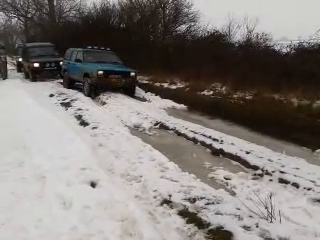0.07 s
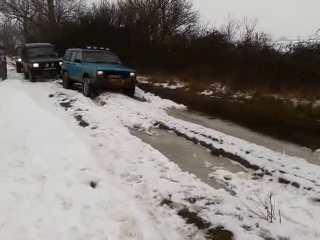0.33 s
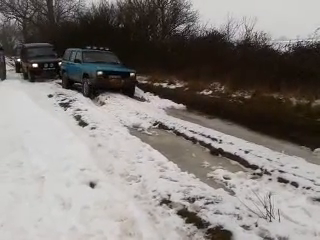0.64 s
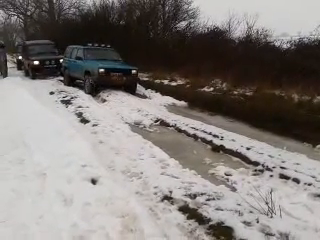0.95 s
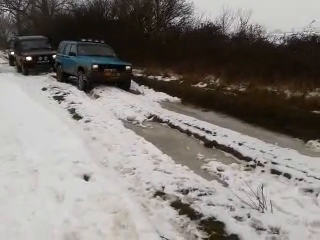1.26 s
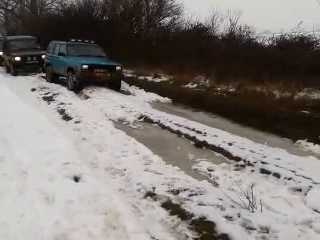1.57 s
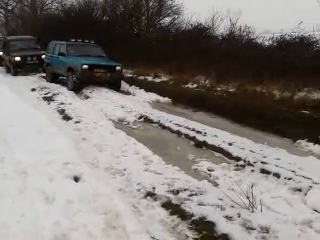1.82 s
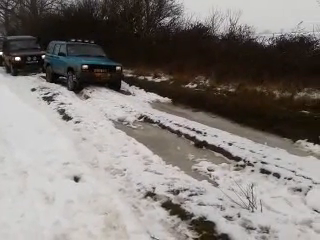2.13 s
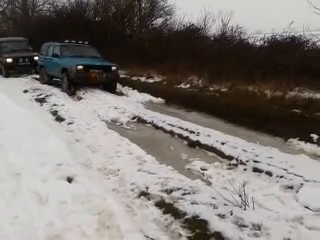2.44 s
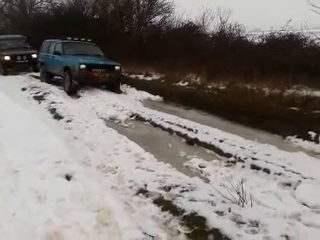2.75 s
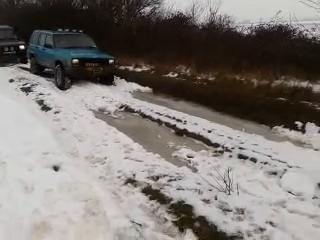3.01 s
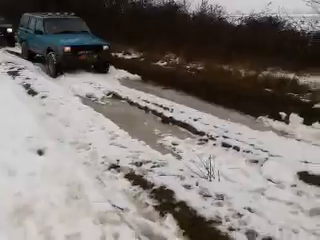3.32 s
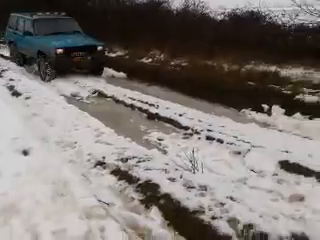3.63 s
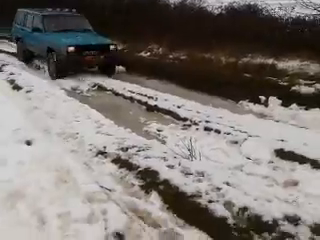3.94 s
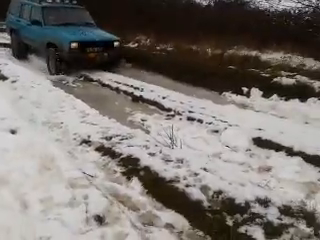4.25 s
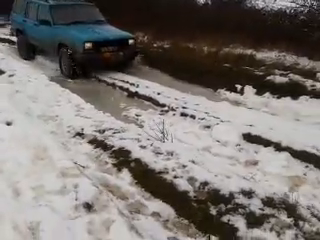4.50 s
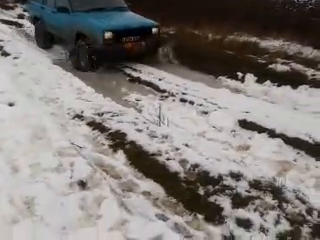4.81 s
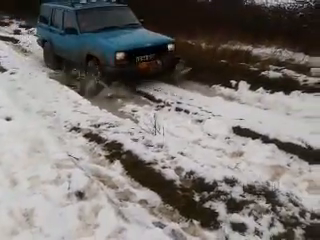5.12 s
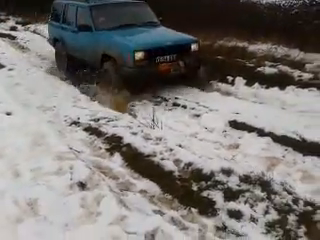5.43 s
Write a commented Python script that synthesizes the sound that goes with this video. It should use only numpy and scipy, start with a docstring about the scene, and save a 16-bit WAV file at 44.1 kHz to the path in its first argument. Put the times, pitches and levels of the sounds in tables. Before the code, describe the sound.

A four-wheel-drive idles beside a knocking diesel, then revs and drives closer, its tyres crunching snow and cracking through ice and slush.

```python
"""Four-wheel-drive on a snowy track

Open snow, light wind rumbling on a narrow-band microphone. A six-cylinder four-wheel-drive idles
about 16 m off, then revs and drives up to 6 m, louder with revs, throttle and nearness. Its firings
boom in the exhaust, its fan hums, and its tyres crunch snow, then crack ice, thud and plop through
a slushy puddle. Behind it a waiting diesel knocks at a steady idle; a few loose rattles ring."""
import sys
import numpy as np
from scipy import signal
from scipy.fft import rfft, irfft, next_fast_len
from scipy.io import wavfile
from scipy.ndimage import map_coordinates

SR = 44100
rng = np.random.default_rng(int(sys.argv[2]) if len(sys.argv) > 2 else 0)


def to_wav(s):
    """Save 16-bit WAV."""
    ch = np.atleast_2d(s).T  # columns
    pcm = np.round(np.clip(ch, -1, 1) * 32767)  # PCM
    wavfile.write(sys.argv[1], SR, pcm.astype(np.int16))


N = 250047
TIME = np.arange(N) / SR

# the six-cylinder's firing rate, from idle to pulling away: t/s, f/Hz
FIRING_RATE = [(0.03, 37.08), (0.4, 35.1), (0.8, 34.12), (1.22, 35.9), (1.6, 34.79), (1.95, 34.66),
               (2.26, 48.1), (2.45, 47.9), (2.75, 42.57), (3, 44.1), (3.3, 57.67), (3.55, 63.06),
               (3.88, 78.07), (4.27, 87.86), (4.5, 99.9), (4.78, 114.3), (5.02, 120.5), (5.35, 112.1),
               (5.64, 102.8)]
IDLE_HZ = 35


def amp(db):
    """Decibels to gain."""
    return 10 ** (np.asarray(db) / 20)


def unit(x):
    """Scale to rms 1."""
    return x / np.sqrt(np.mean(x ** 2) + 1e-20)


def curve(points):
    """One value per sample along the (t/s, value) points."""
    return np.interp(TIME, *np.transpose(points))


def wobble(rate):
    """A smooth random curve, rate knots a second."""
    return map_coordinates(rng.standard_normal(N // 50), [TIME * rate], mode="wrap")


def swell(at_s, width_s):
    """A smooth rise and fall that reaches 1 at at_s."""
    return np.exp(-((TIME - at_s) / width_s) ** 2)


def resonance(points, hz):
    """Gain at this pitch of a body with the (f/Hz, level/dB) response."""
    f, db = np.transpose(points)
    return amp(np.interp(np.log(hz), np.log(f), db))


def colour(x, points):
    """Causal filter with the gain of the (f/Hz, level/dB) points."""
    m = 2 * next_fast_len(N // 2 + SR // 4)
    gain = resonance(points, np.fft.rfftfreq(m, 1 / SR) + 1)
    cepstrum = irfft(np.log(gain), m)
    cepstrum[1:m // 2] *= 2  # fold to minimum phase
    cepstrum[m // 2 + 1:] = 0
    return irfft(rfft(x, m) * np.exp(rfft(cepstrum)), m)[:N]


def low_pass(x, hz):
    """Remove everything above hz."""
    m = next_fast_len(N + SR // 2)
    return irfft(rfft(x, m) * (np.fft.rfftfreq(m, 1 / SR) < hz), m)[..., :N]


def add(track, s, sound):
    """Mix a sound into the track at s seconds."""
    part = track[max(round(s * SR), 0):][:len(sound)]
    part += sound[:len(part)]


def cycle_noise(cycles, count):
    """Noise that repeats with every engine cycle: count orders of random strength."""
    orders = rng.standard_normal(count) * np.exp(2j * np.pi * rng.random(count))
    shape = irfft(np.append(0, orders), 16 * count)
    return unit(np.interp(cycles % 1, np.arange(len(shape)) / len(shape), shape))


def grains(per_second, spread_db):
    """Random impacts, most small and a few large."""
    hit = rng.random(N) < per_second / SR
    size = amp(spread_db * np.minimum(rng.exponential(size=N), 4))
    return unit(hit * size * rng.choice([-1, 1], N))


def loudness(idle_db, octave_db, throttle_db, speed=None, reference_m=15):
    """Gain of a vehicle part by speed (the engine's by default, 1 = idle), throttle and 1/distance."""
    # a blip to move off, then two pushes: t/s, throttle/0-1
    pedal = [(2.08, 0), (2.2, 0.82), (2.42, 0.67), (3.03, 0.5), (3.11, 0.88), (3.94, 0.72), (4.0, 0.6),
             (4.25, 0.5), (4.78, 0.74), (5.17, 0.8), (5.3, 0.3), (5.6, 0.1)]
    # the drive towards the microphone: t/s, distance/m
    approach = [(2.2, 16.35), (3.2, 13.13), (4.2, 9.38), (5.1, 7.2), (5.67, 5.93)]
    if speed is None:
        speed = curve(FIRING_RATE) / IDLE_HZ
    level_db = idle_db + octave_db * np.log2(speed) + throttle_db * curve(pedal)
    return amp(level_db) * reference_m / curve(approach)


def rumble():
    """Light air rumbles on the microphone, with one buffet; the nearing wheels add their own rumble."""
    # spectrum of wind and wheels: f/Hz, level/dB
    spectrum = [(12, 0.5), (25, -1), (45, 0), (90, 2.5), (200, -19.5), (600, -56.5)]
    air = amp(-43 + 11.5 * swell(at_s=2.19, width_s=0.046))
    wheels = loudness(idle_db=-58, octave_db=13, throttle_db=-3)
    drift = amp(0.98 * wobble(3.7))
    return np.hypot(air, wheels) * drift * unit(colour(rng.standard_normal(N), spectrum))


def diesel(first_s=.0325, period_s=.04058, knock_t60=0.028, ring_t60=0.03, ring_width_hz=110):
    """Four cylinders knock in turn and ring the block, over its rush and the exhaust's drone."""
    # in firing order: knock level/dB, offset from even firing/s, ring level/dB, ring f/Hz
    cylinders = [(-1, -.001, -2, 1690), (0, -0.012, -4.5, 1740), (0, -.001, -17, 1440),
                 (1, -.005, -9.5, 1900)]
    # spectrum of the knocks: f/Hz, level/dB
    knock_spectrum = [(350, -32), (600, -9.5), (900, -9), (1150, -11), (1400, 1.5), (1720, -2.5),
                      (2150, -4.5), (2700, -20), (4000, -21), (7000, -23.5)]
    # spectrum of the block's rush: f/Hz, level/dB
    block_spectrum = [(60, -12), (110, 11.5), (165, 5.5), (215, -15), (300, 4), (420, -17), (550, -12),
                      (950, -3), (1150, 0.5), (2100, -2.5), (2750, -14.5), (4500, -18), (7000, -26.5)]
    # exhaust tones: multiple of the firing rate, level/dB
    exhaust_orders = [(1, -49.5), (2, -55.5), (3, -63), (4, -59), (5, -55)]
    t, knocks, rings = np.arange(SR // 10) / SR, np.zeros(N), np.zeros(N)
    burst = (1 - np.exp(-t / 0.0033)) * amp(-60 * t / knock_t60)
    ping = (1 - np.exp(-t / 0.0041)) ** 2 * amp(-60 * t / ring_t60)
    for k, s in enumerate(np.arange(first_s, N / SR, period_s)):
        knock_db, offset_s, ring_db, ring_hz = cylinders[k % len(cylinders)]
        at_s = s + offset_s + rng.normal(0, .0008)
        size = amp(0.4 * s + rng.normal(0, .9))  # the knocks grow as it creeps nearer
        blur = np.cumsum(rng.standard_normal(len(t))) * np.sqrt(ring_width_hz / (2 * np.pi * SR))
        turns = rng.normal(ring_hz, 49.7) * t + blur
        add(knocks, at_s, size * amp(knock_db) * burst * rng.standard_normal(len(t)))
        add(rings, at_s, size * amp(ring_db) * ping * np.sin(2 * np.pi * turns))
    clatter = unit(colour(knocks, knock_spectrum)) + amp(-.5) * unit(rings)
    block = unit(colour(rng.standard_normal(N), block_spectrum))
    phase = 2 * np.pi * (TIME - first_s) / period_s
    drone = sum(amp(db) * np.sin(order * phase + .25 * wobble(4)) for order, db in exhaust_orders)
    return drone + amp(-48) * clatter + amp(-43.5 + 1.3 * wobble(3.5)) * block


def metallic_rings(attack_s=0.0011):
    """Loose rattles and two louder diesel knocks ring briefly, the modes at new strengths each time."""
    # rattles, and diesel knocks at 2.472 and 2.957 s: t/s, peak level/dB
    strikes = [(.036, -32), (.075, -25.5), (.135, -33), (.238, -27.5), (.29, -33), (0.459, -33),
               (2.472, -31), (2.715, -29), (2.957, -30)]
    # the metal's modes: f/Hz, level/dB, t60/s
    modes = [(740, -3, 0.093), (933, 0, 0.052), (1420, -1.5, 0.097), (1540, -2, 0.027), (2050, -13, 0.034)]
    t, out = np.arange(SR // 5) / SR, np.zeros(N)
    for s, peak_db in strikes:
        ring = np.zeros(len(t))
        for hz, db, t60 in modes:
            decay = amp(db + rng.normal(0, 3) - 60 * t / t60)
            ring += decay * np.sin(2 * np.pi * (hz * t + rng.random()))
        ring *= 1 - np.exp(-t / attack_s)
        add(out, s, amp(peak_db) * ring / np.abs(ring).max())
    return out


def snow(slush_at_s=3.67, slush_rise_s=0.48, slush_db=11.5):
    """Tread blocks squeeze the snow to a soft hiss, then crush crust and slush into a dense crackle."""
    # spectrum of crushed clumps: f/Hz, level/dB
    crunch_spectrum = [(400, -16), (800, -26.5), (1050, -5.5), (1300, 5.5), (1550, -26.5), (1800, -2),
                       (2200, -4.5), (2750, -12), (3300, -7), (3900, -8.5), (4500, -18.5), (5400, -16.5),
                       (6500, -9), (7400, -22.5)]
    # spectrum of squeezed powder: f/Hz, level/dB
    powder_spectrum = [(1500, -21), (2900, -12.5), (3450, -1), (3700, -2.5), (4100, 3.5), (4800, -2),
                       (5600, -16.5), (7000, -22.5)]
    # a creeping tyre squeezes the snow: t/s, level/dB
    squeezes = [(0.02, -61), (1.64, -59.5), (4.33, -45)]
    clumps = amp(1.45 * wobble(25) + 1.2 * wobble(130))
    crystals = grains(3000, spread_db=3)
    crunch = unit(colour(clumps * (crystals + 1.6 * rng.standard_normal(N)), crunch_spectrum))
    hiss = unit(colour(grains(5000, spread_db=2), powder_spectrum))
    in_slush = np.clip((TIME - slush_at_s) / slush_rise_s, 0, 1)
    crushed = loudness(idle_db=-58.5, octave_db=6.5, throttle_db=3.5) * amp(slush_db * in_slush)
    splash = amp(-31.5) * swell(at_s=6.3, width_s=0.23)  # puddle spray: only its faint onset sounds
    rolling = loudness(idle_db=-62, octave_db=3, throttle_db=7)
    squeezed = sum(amp(db) * swell(s, width_s=0.22) for s, db in squeezes)
    return np.hypot(crushed, splash) * crunch + (rolling + squeezed) * hiss


def puddle_impacts(thump_t60=0.022):
    """Ice cracks, wheel thuds and slush plops, each a crackling burst with a thump."""
    # impacts: t/s, burst peak/dB, burst t60/s, tilt/(dB per octave), thump level/dB, thump f/Hz
    impacts = [(3.994, -22, 0.046, -3, -13, 684), (4.190, -17, .05, -0.5, -21, 170),
               (4.282, -23, 0.038, 0.5, -18.5, 169.2), (4.318, -13, 0.036, 4.5, -19, 298),
               (4.670, -7, 0.068, 2.5, -11.5, 482), (4.7094, -2.5, 0.026, 0.5, 1.3, 322),
               (4.7175, -8, 0.05, 2, -12, 200), (4.998, -15, .05, 5, -11, 330),
               (5.1055, -11.5, 0.041, 6.5, -20.5, 400), (5.1446, -4.5, 0.01, -.5, -3.5, 678),
               (5.170, -7, 0.081, 4.5, -19.5, 408), (5.2232, -7.5, .012, -1.5, -10, 675.6),
               (5.333, -14.5, .05, -4.5, -8, 690), (5.398, -9, 0.026, 4.5, -13, 587),
               (5.412, -9, .05, 5.5, -14.5, 656), (5.481, -13, 0.09, -3, -7.5, 217),
               (5.629, -22, 0.046, -0.5, -5, 630)]
    # spectrum of the bursts before their tilt: f/Hz, level/dB
    spectrum = [(150, -19), (420, -0.5), (650, 9), (1000, -8), (1350, -0.5), (1800, -9.5), (2200, -5.5),
                (3000, -22.5), (7000, -31)]
    t, out = np.arange(SR // 10) / SR, np.zeros(N)
    for s, burst_db, burst_t60, tilt, thump_db, thump_hz in impacts:
        tilted = [(hz, db + tilt * np.log2(hz)) for hz, db in spectrum]
        response = colour(np.ones(1), tilted)[:len(t)]
        crackle = rng.standard_normal(len(t)) * amp(-60 * t / burst_t60)
        burst = signal.fftconvolve(crackle, response)[:len(t)]
        thump = np.sin(2 * np.pi * thump_hz * t) * amp(thump_db - 60 * t / thump_t60)
        add(out, s, amp(burst_db) * burst / np.abs(burst).max() - thump)
    return out


def fan(blades_per_firing=4.33, slip_hz=242, slip_power=.39, lag_s=.02):
    """The blades hum in turbulent air and lag behind the engine; at high revs their clutch slips."""
    # the shroud favours some blade pitches: f/Hz, level/dB
    shroud = [(155, 1), (185, -4.5), (207, -2.5), (228, -10), (272, 3.5), (315, 1.5)]
    driven_hz = blades_per_firing * curve(FIRING_RATE)
    clutch_hz = np.minimum(driven_hz, slip_hz * (driven_hz / slip_hz) ** slip_power)
    inertia = np.exp(-1 / (lag_s * SR))
    blade_hz = clutch_hz[0] + signal.lfilter([1 - inertia], [1, -inertia], clutch_hz - clutch_hz[0])
    flutter = .18 * wobble(45)
    phase = 2 * np.pi * np.cumsum(blade_hz * (1 + 0.0016 * wobble(16))) / SR + flutter
    speed = blade_hz / (blades_per_firing * IDLE_HZ)
    gain = loudness(idle_db=-44, octave_db=2, throttle_db=5, speed=speed) * resonance(shroud, blade_hz)
    return gain * amp(1.5 * wobble(24)) * np.sin(phase)


def engine_bay(x, sink_at_s=3.93, sink_time_s=1.6, near_ratio=0.953):
    """The bay's resonances colour a sound, a little lower in pitch when the vehicle is close."""
    # response of the bay: f/Hz, level/dB
    bay = [(240, -41), (410, -20), (505, -10.5), (590, -3), (685, -0.5), (820, -5.5), (1130, -19.5),
           (1430, -9), (1850, -18.5), (2250, -12), (2760, -27.5), (3400, -23), (4440, -35.5), (5260, -27.5),
           (6620, -36), (7300, -52.5), (9490, -46.5), (16100, -120)]
    far = unit(colour(x, bay))
    near = unit(colour(x, [(hz * near_ratio, db) for hz, db in bay]))
    close = np.clip((TIME - sink_at_s) / sink_time_s, 0, 1)
    return (1 - close) * far + close * near


def roar(firings):
    """In the bay, valve gear repeats every six firings and combustion rush swells once a firing."""
    # the roar swells briefly: t/s, half length/s, gain/dB
    surges = [(3.986, 0.03, 2.5), (5.426, 0.052, 1), (5.622, 0.044, 1)]
    gear = engine_bay(cycle_noise(firings / 6, count=170))
    rush = engine_bay((1 + .35 * np.cos(2 * np.pi * firings)) * rng.standard_normal(N))
    surge_db = sum(db * swell(s, width_s) for s, width_s, db in surges)
    gain = loudness(idle_db=-43.5, octave_db=9, throttle_db=2) * amp(surge_db)
    return gain * (rush + amp(-4.5) * gear)


def exhaust(firings, firing_hz):
    """Puffs of gas boom at the firing rate and its octave, throb in the silencer, burble in the pipe."""
    # the silencer favours some pitches as the note sweeps through: f/Hz, level/dB
    silencer = [(35, 0.5), (43, -1), (48, 0), (53, 3), (60, 1.5), (70, 2), (78, 4), (85, -4), (93, -2),
                (101, 1), (106, -1), (112, 5.5), (120, 3.5), (140, -7.5), (230, -5.5)]
    # response to single puffs: f/Hz, level/dB
    throb_response = [(40, -27.5), (90, -8.5), (125, -0.5), (170, 0), (230, 0), (400, -38)]
    # response of the pipe: f/Hz, level/dB
    pipe = [(45, -8), (80, -7.5), (115, 1), (180, -.5), (240, -1.5), (320, -2.5), (420, -14), (600, -26),
            (1200, -65.5)]
    phase = 2 * np.pi * firings
    note = resonance(silencer, firing_hz) * np.sin(phase)
    note *= loudness(idle_db=-41, octave_db=4.5, throttle_db=5)
    octave = resonance(silencer, 2 * firing_hz) * np.sin(2 * phase + 1)
    octave *= loudness(idle_db=-39.5, octave_db=-0.5, throttle_db=-6)
    boom = amp(.6 * wobble(15)) * (note + octave)
    # Under load at low revs the single puffs stand apart.
    pulses = unit(colour(np.exp(5 * np.cos(phase)), throb_response))
    throb = loudness(idle_db=-51, octave_db=-16, throttle_db=27.5) * pulses
    puffs = unit(colour((1 + 0.47 * np.cos(phase)) * rng.standard_normal(N), pipe))
    # Unequal cylinders fill the gaps between the firing orders.
    uneven = unit(colour(cycle_noise(firings / 6, count=70), pipe))
    burble = loudness(idle_db=-49.5, octave_db=11.5, throttle_db=1) * (puffs + amp(-4) * uneven)
    return boom + throb + burble


def engine():
    """Six cylinders fire, slightly unsteadily; each firing pushes the exhaust and shakes the bay."""
    firing_hz = curve(FIRING_RATE)
    firings = np.cumsum(firing_hz * (1 + .0015 * wobble(14))) / SR
    return exhaust(firings, firing_hz) + roar(firings)


def scene():
    """Both vehicles in the open at one microphone, with no echo over the snow."""
    return (engine() + fan() + diesel() + metallic_rings() + snow() + puddle_impacts() + rumble())[None]


def record(dry):
    """A narrow-band microphone feeds a recorder that clips the highest peaks."""
    microphone = low_pass(dry, hz=7300)
    clipped = np.clip(microphone, -.71, .71)
    return low_pass(clipped, hz=15800)


dry = scene()
out = record(dry)
to_wav(out)
```